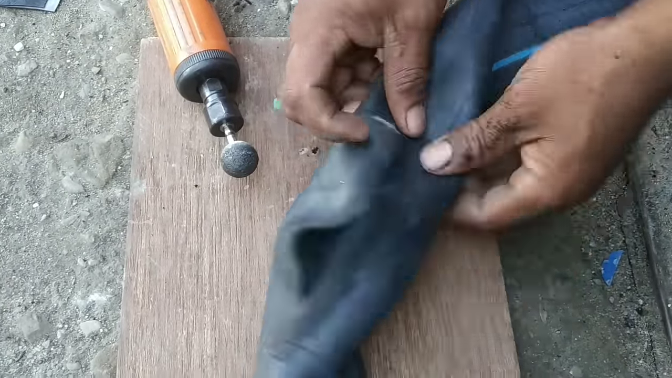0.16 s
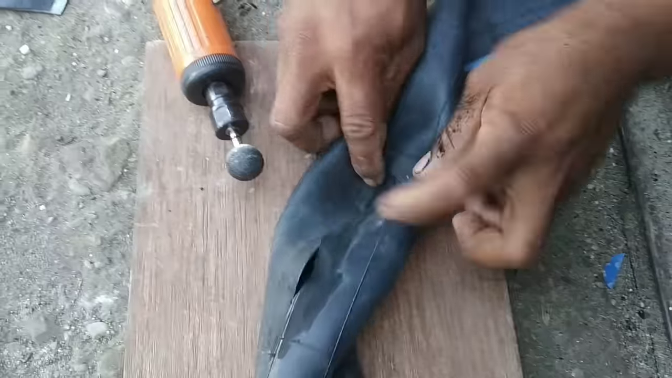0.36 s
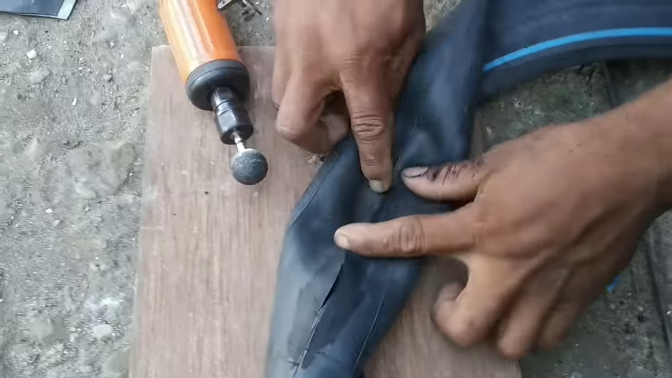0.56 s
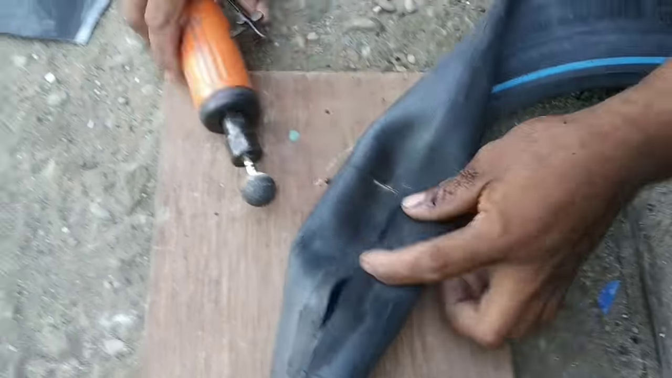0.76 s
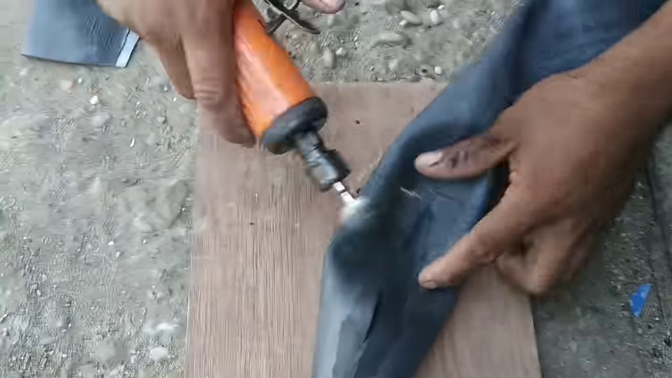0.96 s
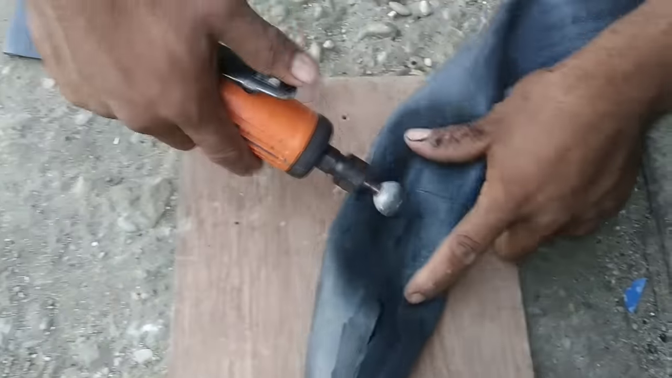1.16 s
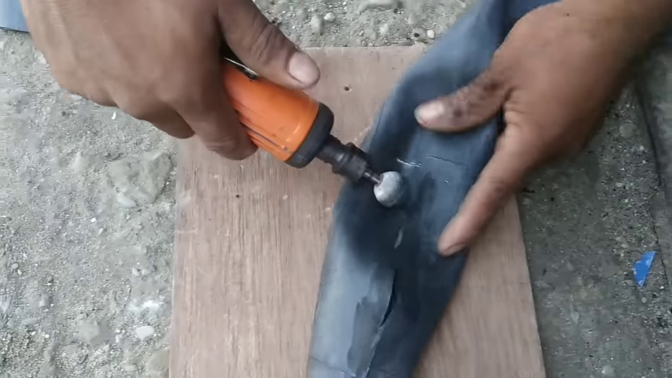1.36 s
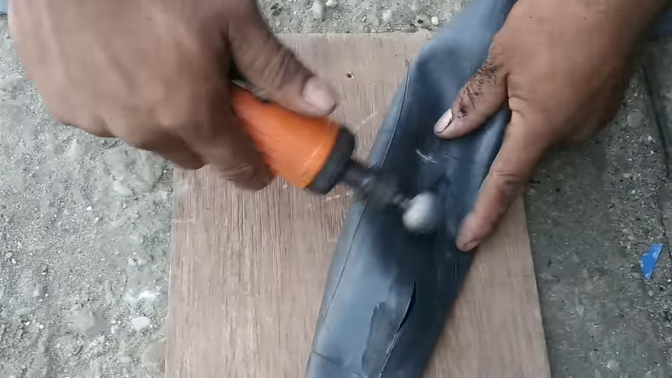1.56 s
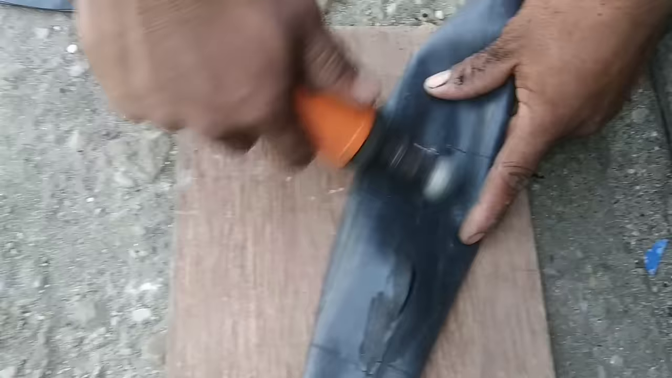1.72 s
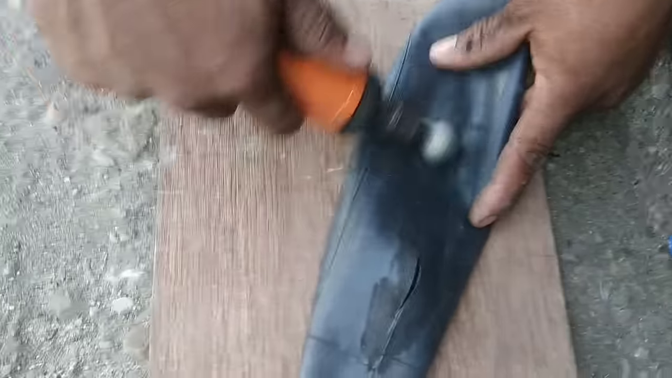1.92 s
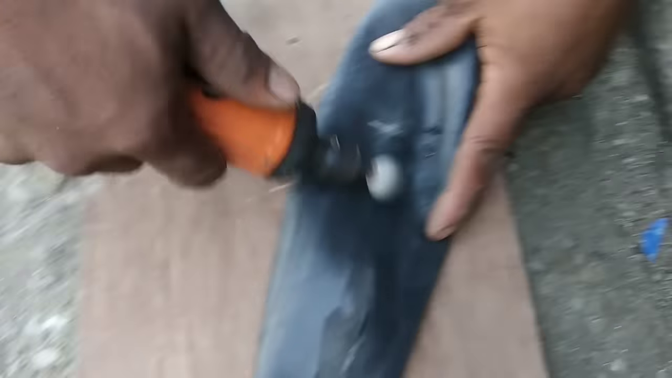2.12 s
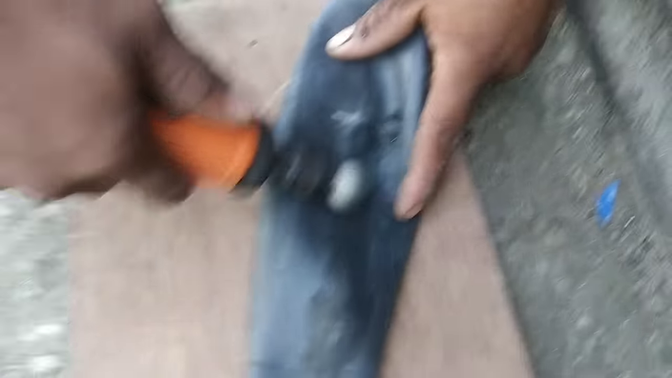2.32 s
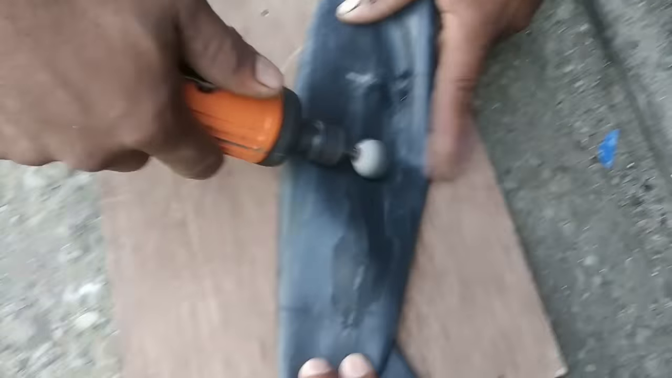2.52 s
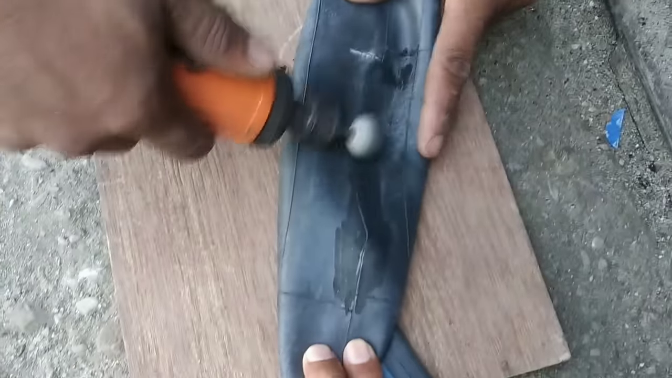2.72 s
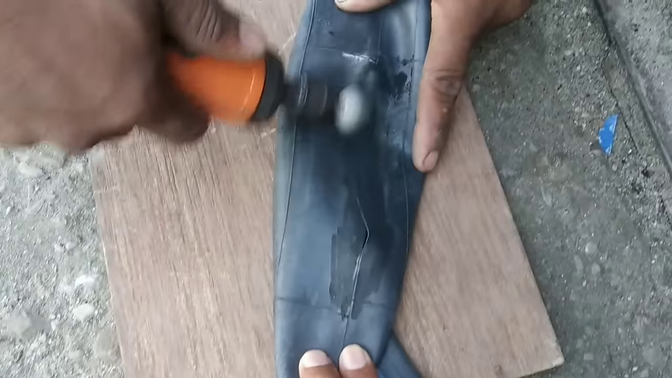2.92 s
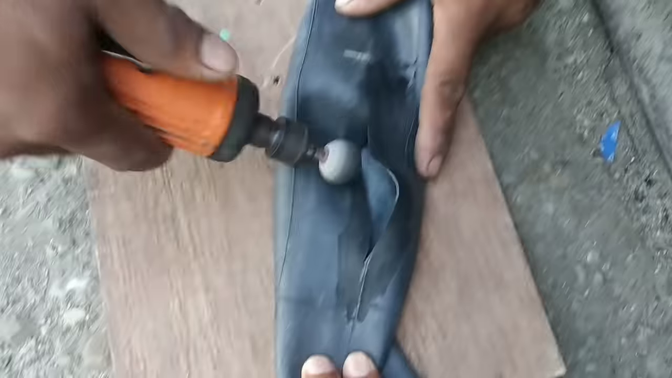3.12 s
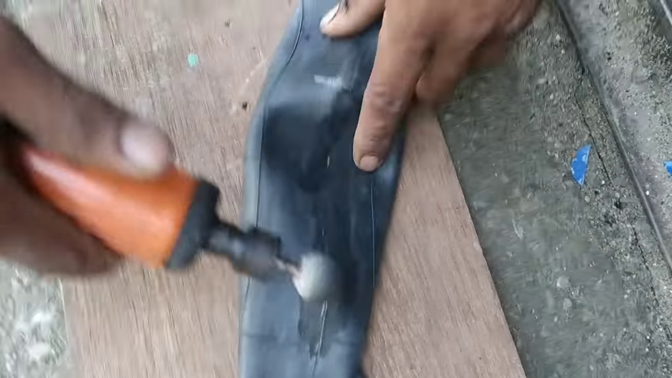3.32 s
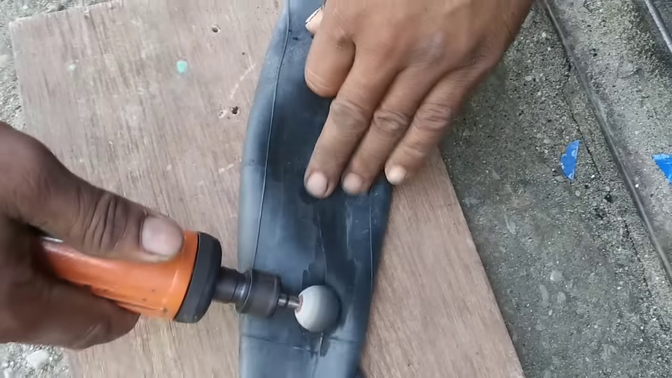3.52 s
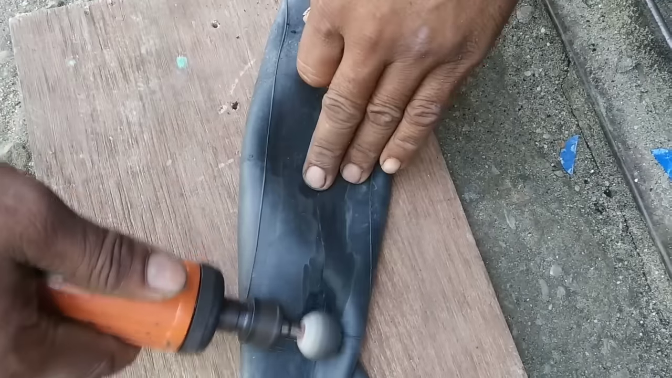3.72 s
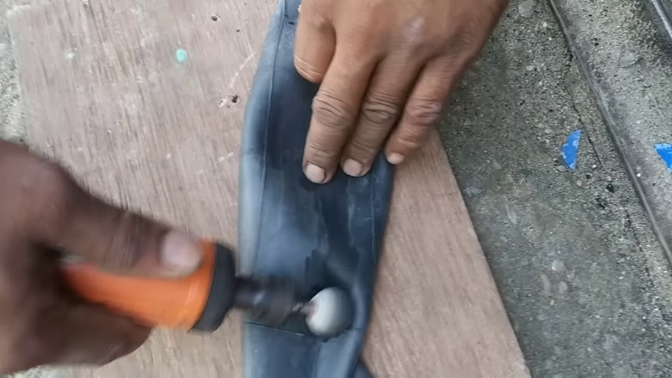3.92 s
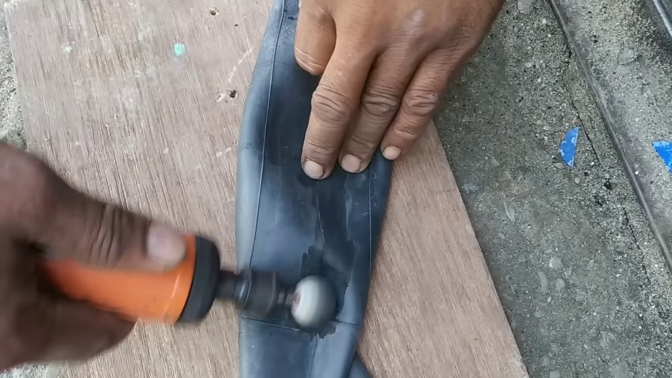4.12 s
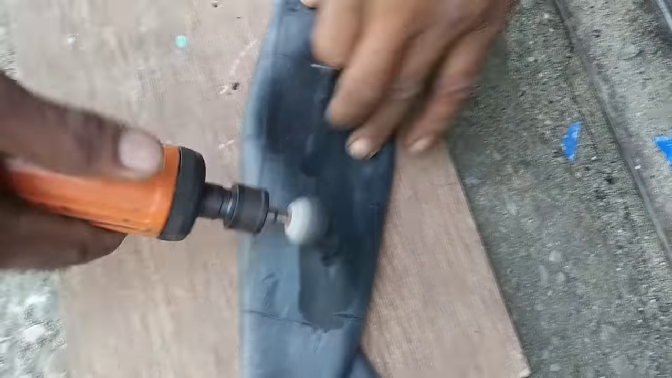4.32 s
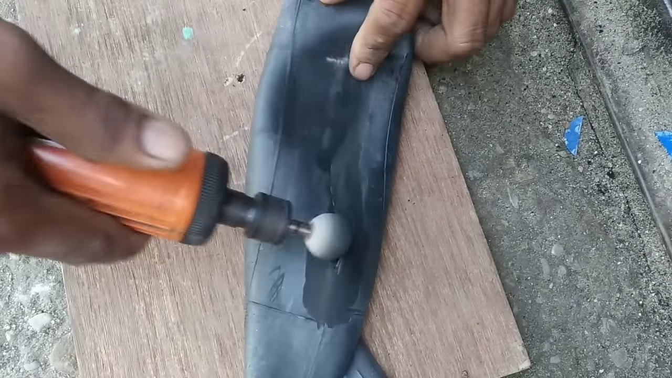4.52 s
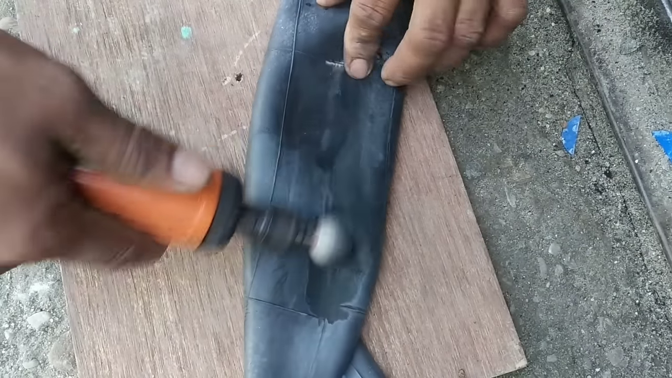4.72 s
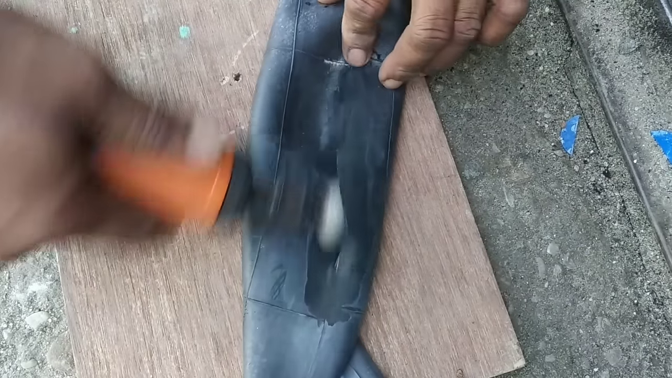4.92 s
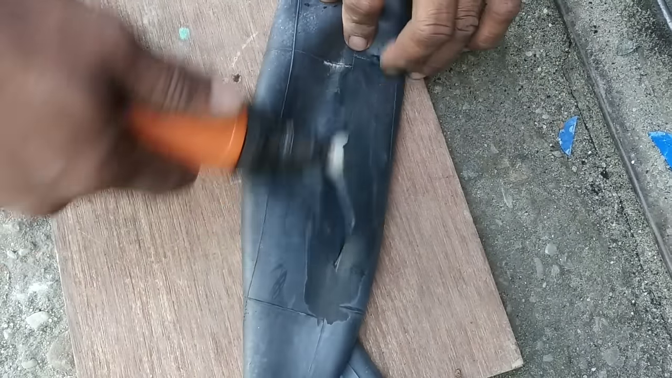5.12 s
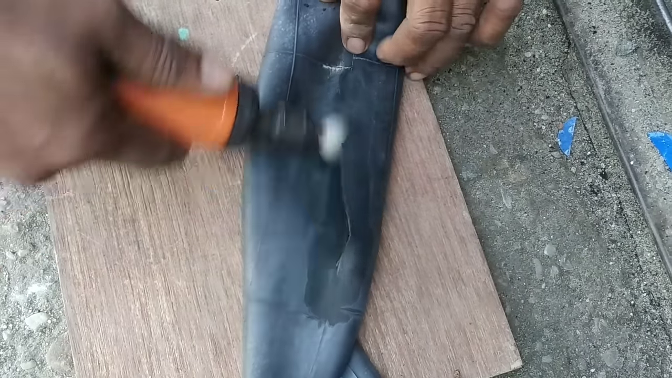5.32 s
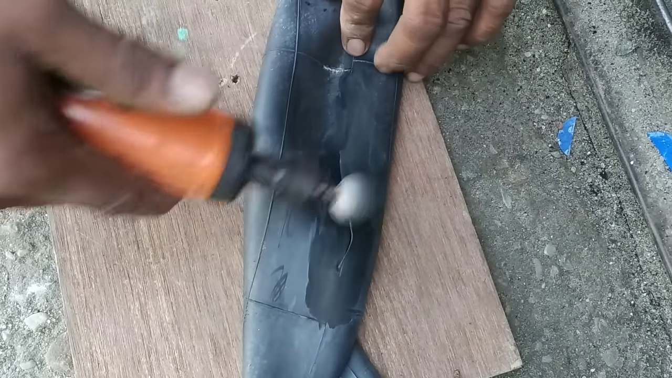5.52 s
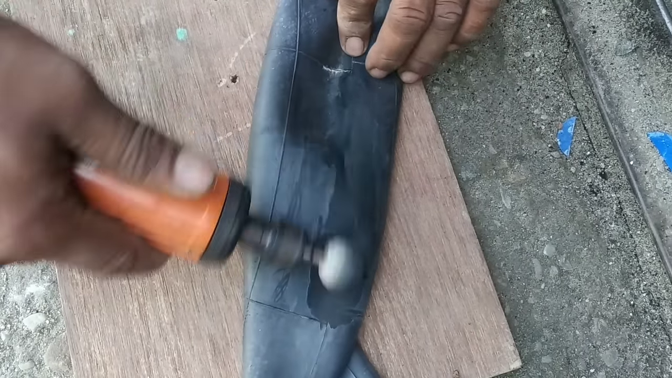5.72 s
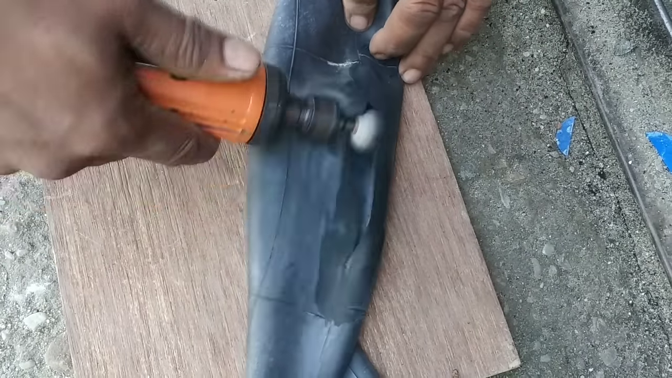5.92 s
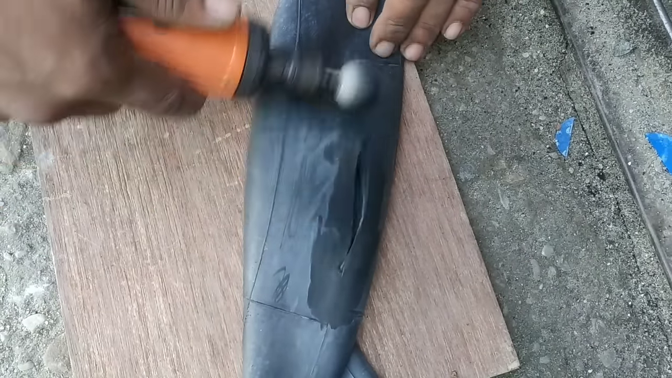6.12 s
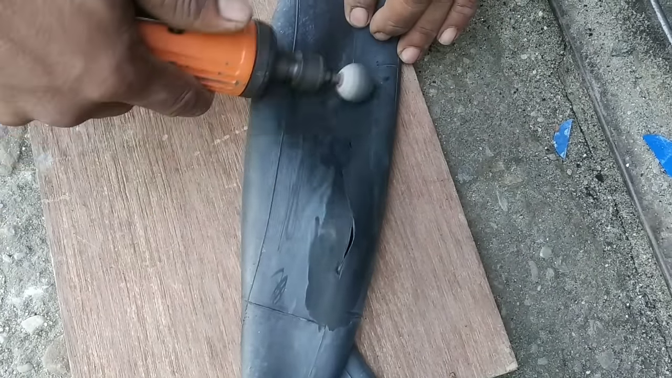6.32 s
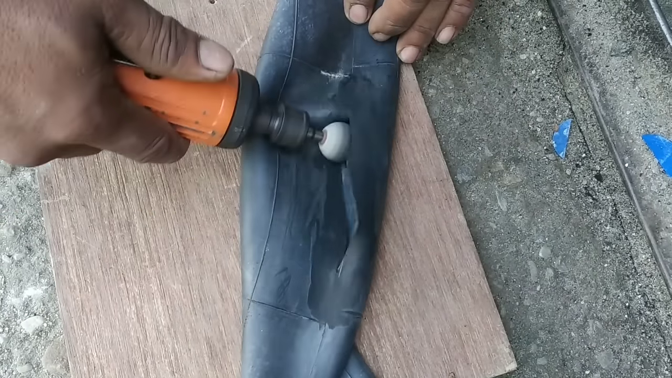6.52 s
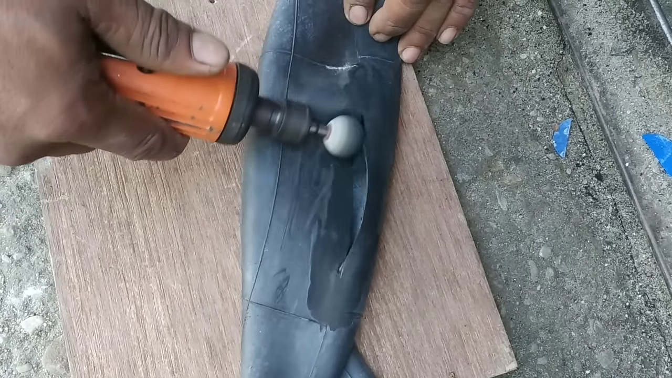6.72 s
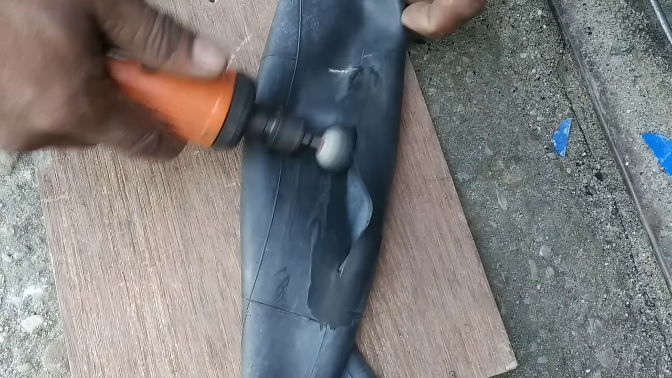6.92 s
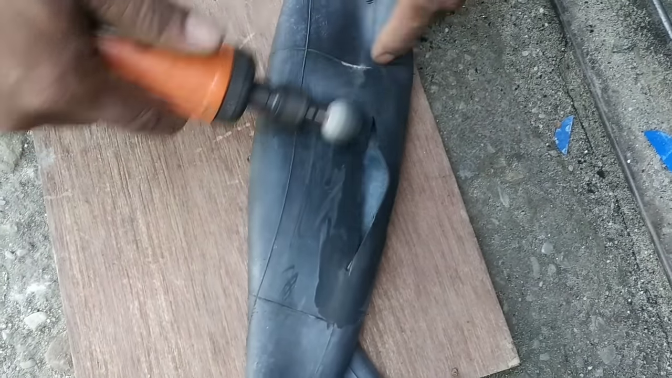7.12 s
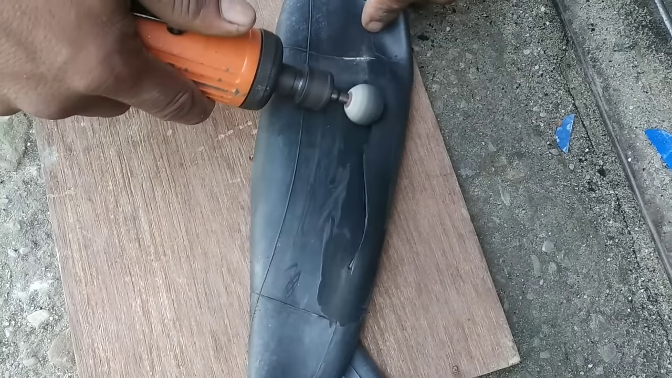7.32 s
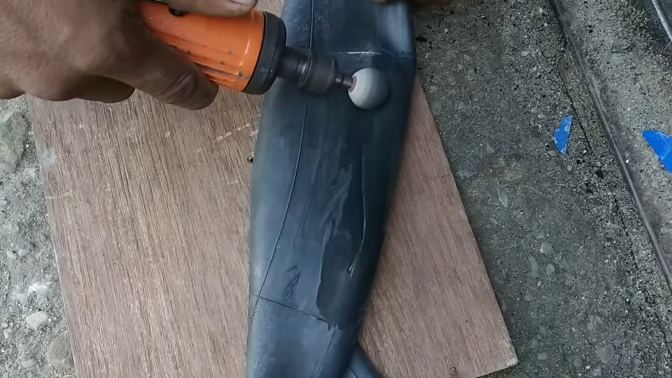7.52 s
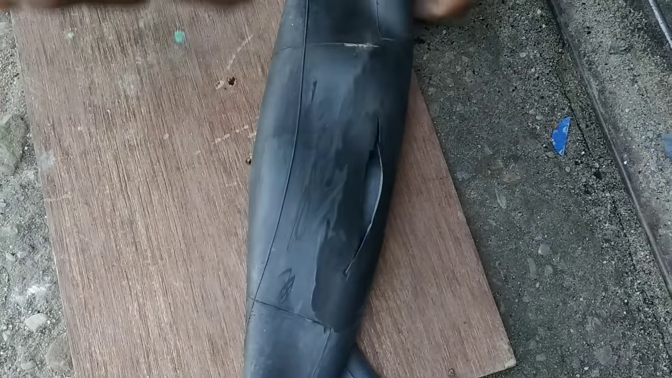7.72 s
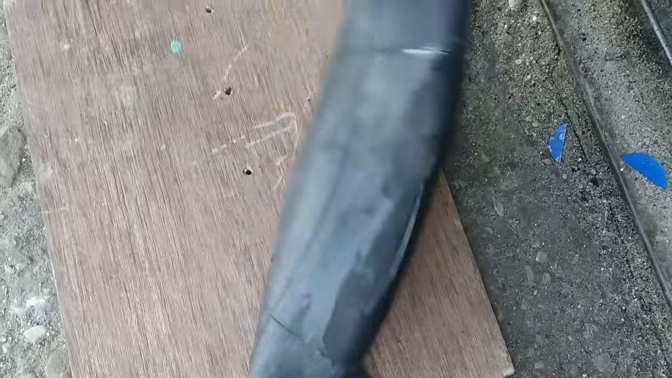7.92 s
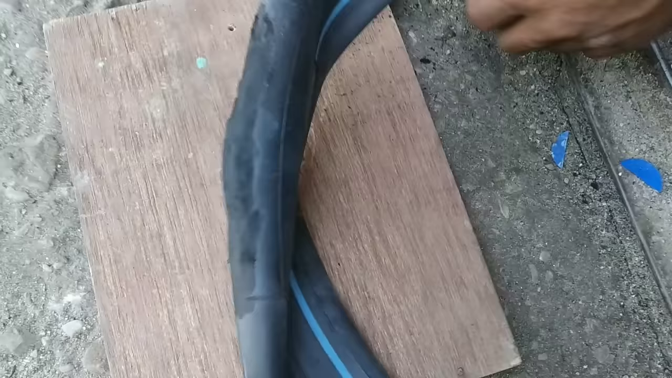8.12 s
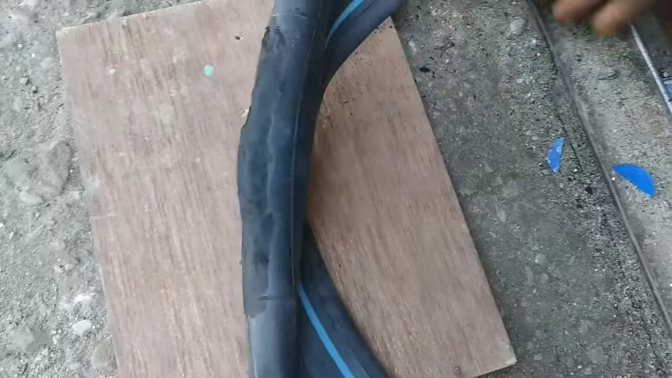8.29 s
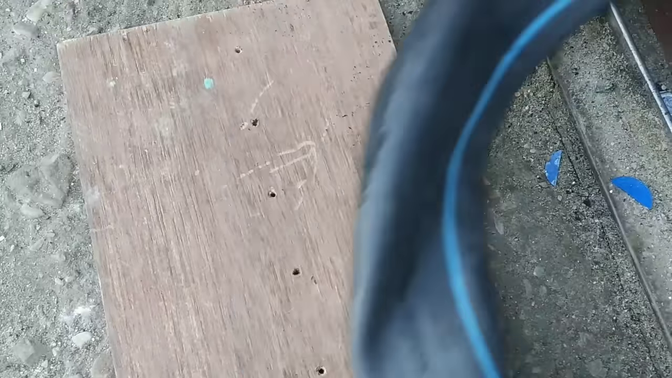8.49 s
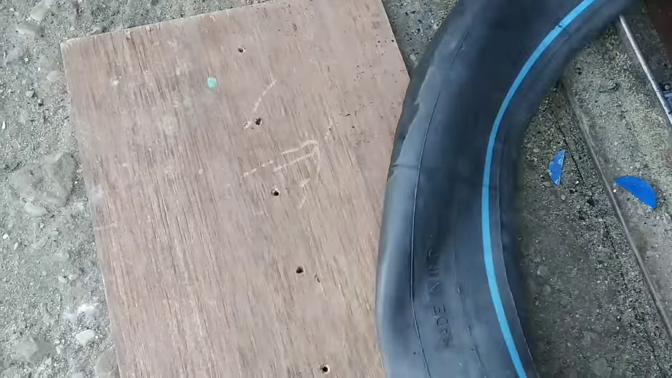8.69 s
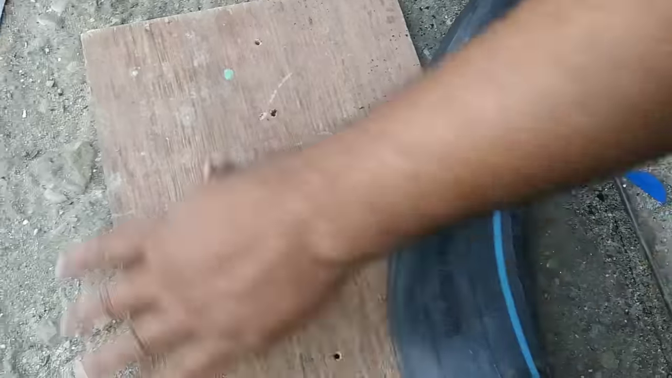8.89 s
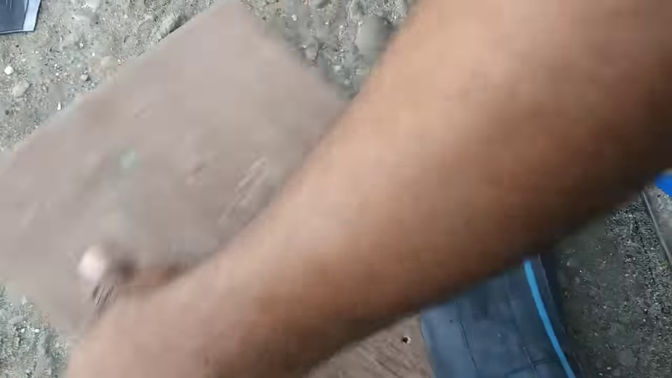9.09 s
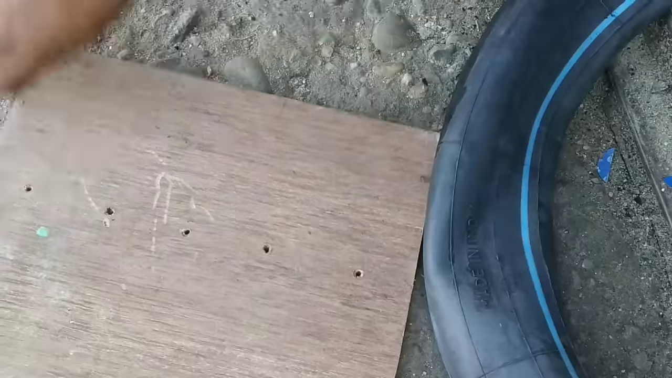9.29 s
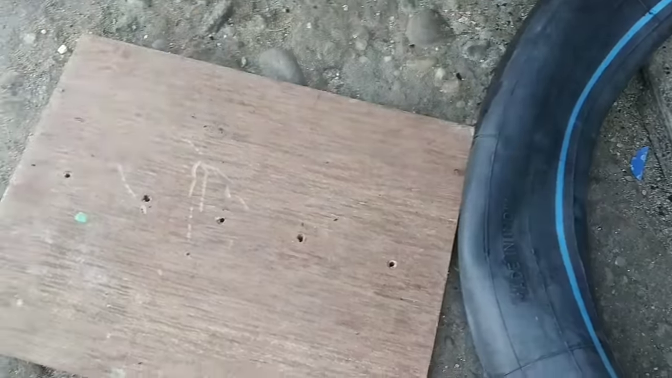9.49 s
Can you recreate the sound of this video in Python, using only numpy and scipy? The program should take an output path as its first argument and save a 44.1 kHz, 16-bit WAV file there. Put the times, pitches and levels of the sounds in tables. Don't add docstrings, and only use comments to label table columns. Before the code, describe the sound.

An open-air spot with low traffic rumble and faint steady hiss, heard close up in stereo. Rubber rustles softly at first; a far horn gives two short toots at about 0.5 and 0.7 s, and wood is knocked at 0.6 s and tapped until 1.0. At 1.45 s an air grinder bursts on, racing up within a tenth of a second to a piercing whine around 1.1 kHz with overtones and bright, rough hiss. Quick even strokes make its pitch dip until 3.1 s. It runs again from 3.35 to 4.3, 4.45 to 5.4 and 5.5 to 7.7 s, with falling whirr and puffing air between, and irregular deeper sags in the last spells. The air fades by 8 s. Knocks at 8.0 to 8.6 s mix with a rubbery flop. From 8.9 to 9.4 s the board rattles and scrapes loudly over grit, then only faint background remains.

```python
import sys
import numpy as np
from scipy import signal
from scipy.fft import rfft, irfft, next_fast_len
from scipy.io import wavfile
from scipy.ndimage import uniform_filter1d

SR = 44100
rng = np.random.default_rng(int(sys.argv[2]) if len(sys.argv) > 2 else 0)


def ratio_of_db(decibels):
    return 10 ** (np.asarray(decibels, float) / 20)


def put_to_file(sound):
    columns = np.atleast_2d(sound).T
    safe = np.clip(columns, -1, 1)
    whole_steps = np.round(safe * 32767)
    wavfile.write(sys.argv[1], SR, whole_steps.astype(np.int16))


N = 421155
TIME = np.arange(N) / SR
LEFT_LAG_S = 0.0003222
PIECE = 1024


def rms_one(x):
    return x / np.sqrt(np.mean(x ** 2) + 1e-20)


def undb(db):
    return np.exp(db * (np.log(10) / 20))


def in_time(rows):
    s, *columns = np.transpose(rows)
    return [np.interp(TIME, s, c) for c in columns]


def at_hz(points, hz):
    point_hz, level_db = np.transpose(points)
    return np.interp(np.log(hz + 1), np.log(point_hz), level_db)


def drift(rate):
    r = np.exp(-80 * np.pi * rate / SR)
    draws = rng.standard_normal(N // 40 + 2002)
    slow = signal.lfilter([1], [1, -2 * r, r * r], draws)[2000:]
    return np.interp(np.arange(N) / 40, np.arange(len(slow)), rms_one(slow))


def resonate(x, hz, width_hz):
    r, w = np.exp(-np.pi * width_hz / SR), 2 * np.pi * hz / SR
    return signal.lfilter([0, np.sin(w)], [1, -2 * r * np.cos(w), r * r], x + 1e-18)


def bump(s, length):
    return np.exp(-.5 * ((TIME - s) / length) ** 2)


def both_ports(x, pan_db=0):
    late = np.interp(TIME - LEFT_LAG_S, TIME, x)
    return np.array([late * ratio_of_db(pan_db / 2), x * ratio_of_db(-pan_db / 2)])


# frequency_hz, likeness_share
LIKENESS = [(25, 0.77), (70, 1), (140, 1), (300, 1), (700, 0.53), (1500, 0.094), (4000, 0.049),
            (12000, 0.1)]
# frequency_hz, left_minus_right_db
LEAN = [(60, -0.5), (180, 0), (550, -1), (1650, 2.5), (4000, 4.5), (7500, 1.5), (15000, -1.5)]


def lean_db(spectrum, hz):
    return at_hz(spectrum, hz) + at_hz(LEAN, hz) * [[.5], [-.5]]


def stereo_noise(spectrum, edges_hz, patchy_db, rate):
    size = next_fast_len(N)
    hz = np.arange(size // 2 + 1) * SR / size
    shared, left, right = rfft(rng.standard_normal((3, size)))
    alike = np.clip(at_hz(LIKENESS, hz), 0, 1)
    delayed = shared * np.exp(-2j * np.pi * hz * [[LEFT_LAG_S], [0]])
    pair = np.sqrt(alike) * delayed + np.sqrt(1 - alike) * np.array([left, right])
    pair = pair * ratio_of_db(lean_db(spectrum, hz))
    out, together = 0, drift(rate)
    for k in range(len(edges_hz)):
        mask = np.interp(hz, edges_hz, np.arange(len(edges_hz)) == k)
        flicker = undb(patchy_db * (0.44 * together + drift(rate)))
        out = out + irfft(pair * mask, size)[:, :N] * flicker
    return rms_one(out)


def coloured(x, spectrum):
    size = next_fast_len(N)
    hz = np.arange(size // 2 + 1) * SR / size
    return irfft(rfft(x, size) * ratio_of_db(lean_db(spectrum, hz)), size)[:, :N]


def noise_swells(rows):
    grains = rng.standard_normal((2, N)) * ratio_of_db(1.7 * drift(120))
    out = np.zeros((2, N))
    for s, length, db, hz in rows:
        near = slice(max(round((s - 3 * length) * SR), 0), round((s + 3 * length) * SR))
        swell = np.exp(-.5 * ((TIME[near] - s) / length) ** 2)
        out[:, near] += ratio_of_db(db) * swell * rms_one(resonate(grains[:, near], hz, 0.14 * hz))
    return out


# centre_s, length_s, gain_db
RATTLE_DUCK = (9.186, 0.043, -21)


def ducking():
    duck_db, lead_s, hold_s, fade_s = -23, 0.049, 0.041, .07
    loud = 0
    for opens, full, shuts in SPELLS:
        since = TIME - full + lead_s + fade_s / 2
        left = shuts + hold_s + fade_s - TIME
        loud = loud + np.clip(np.minimum(since, left) / fade_s, 0, 1)
    s, length, db = RATTLE_DUCK
    return duck_db * loud, db * bump(s, length)


# frequency_hz, density_db_per_hz
TRAFFIC = [(12, -39), (20, 7.5), (54, -3), (70, 5.5), (103, -1.5), (157, 2.5), (248, -10.5), (500, -14),
           (650, -14.5), (1100, -120)]
# frequency_hz, density_db_per_hz
YARD = [(180, -7.5), (300, -10), (602, -7.5), (688, -5.5), (911, -8), (1380, -11), (1950, -8),
        (3160, -10.5), (3730, -10.5), (5290, -9), (11000, -4), (15800, -13)]
# time_s, level_db
RUMBLE_DB = [(0, -43.5), (1.5, -43.5), (4.4, -38.5), (5.6, -40), (7.8, -46.5), (8.85, -50), (8.96, -44),
             (9.55, -50)]


def street():
    tool_db, rattle_db = ducking()
    rumble = stereo_noise(TRAFFIC, [30, 70, 140, 280], patchy_db=2.5, rate=2.74)
    rumble = rumble * ratio_of_db(in_time(RUMBLE_DB)[0] + tool_db + 0.6 * rattle_db)
    deep = signal.sosfilt(signal.butter(2, 188, fs=SR, output="sos"), rumble)
    session = (TIME > SPELLS[0][1]) & (TIME < SPELLS[-1][2])
    rumble = deep + (rumble - deep) * ratio_of_db(-2 * session)
    hiss = stereo_noise(YARD, [400, 900, 2000, 4000, 7000, 10000, 14000], patchy_db=1.66, rate=20.0)
    return rumble + hiss * ratio_of_db(-45 + rattle_db)


# centre_s, length_s, level_db, pitch_hz
RUSTLES = [
    (.08, .03, -50, 2350),
    (0.214, 0.021, -52, 2950),
    (0.945, 0.036, -50.5, 4600),
    (1.244, .04, -54.5, 3420),
    (7.883, 0.064, -56.5, 1300),
    (8.446, 0.036, -46.5, 1580),
    (8.293, 0.0058, -45, 4400),
]


def rustles():
    return noise_swells(RUSTLES)


# start_s, end_s, level_db
TOOTS = [
    (.462, .546, -48),
    (.656, .742, -48),
]
# harmonic_number, level_db
HORN = [(6, -10), (7, 5), (8, 7.5), (9, -2), (10, -9), (11, -3), (12, -9)]


def horn():
    horn_hz = 399
    tone, on = 0, 0
    for k, db in HORN:
        phase = k * 0.17 * drift(40) + rng.uniform(0, 9.1)
        tone = tone + ratio_of_db(db + 2.5 * drift(13)) * np.sin(2 * np.pi * k * horn_hz * TIME + phase)
    for start, end, db in TOOTS:
        attack = np.clip((TIME - start) / 0.013, 0, 1)
        on = on + ratio_of_db(db) * attack * np.exp(-np.clip(TIME - end, 0, 9) / 0.0088)
    return both_ports(tone * on * ratio_of_db(2.5 * drift(60) - 6), pan_db=6)


# pitch_hz, width_hz, level_db
BOARD = [(1300, 95, -11), (1700, 590, 1.5), (2000, 600, -11.5), (2790, 1200, -46)]
# start_s, peak_db, pitch_hz, brightness_db, left_minus_right_db
KNOCKS = [
    (0.598, -29.5, 946, -27, 2),
    (0.84, -45, 826, -10, 2.5),
    (0.918, -37.5, 900, -16, 5),
    (0.99, -39.5, 910, -14, 2.5),
    (8.034, -33.5, 650, -2, 2),
    (8.151, -41, 620, -17, 2),
    (8.325, -31, 865, -8, 6),
    (8.358, -40.5, 880, -9, -1.0),
    (8.427, -45, 610, 13, 2),
    (8.581, -37, 890, -11, 4),
]
RATTLE = [(8.935, -34, 780, -18, 3), (9.002, -26.5, 810, -17, 6), (9.014, -30.5, 700, -23, -3),
          (9.028, -32.5, 1880, 3, 3), (9.033, -30.5, 800, -14, 8), (9.073, -20, 780, -14, 5),
          (9.089, -26, 754, -19, 10), (9.116, -26.5, 2040, 0, 6), (9.119, -35, 755, -8, 9),
          (9.133, -36, 1700, -4, 6), (9.144, -26, 1990, 4.5, -3), (9.149, -30, 910, -11, -2),
          (9.162, -24, 900, -20, 9), (9.172, -23, 760, -7.5, -4), (9.177, -20.5, 1880, -15, 9),
          (9.206, -22, 920, -11, -9), (9.209, -23, 2030, 0.5, 3.5), (9.213, -27, 1300, -4, -9),
          (9.245, -24.5, 935, -9, -1), (9.25, -26, 920, -16, 16), (9.279, -22.5, 980, -5.5, -1),
          (9.298, -26, 1550, -4.5, -2), (9.303, -27, 1510, -15, -11), (9.309, -30, 795, -20, -11),
          (9.327, -23.5, 970, -12, 8), (9.344, -34, 950, -15, 8)]


def knocks():
    out, size = np.zeros((2, N)), 3000
    t = np.arange(size) / SR
    push = t / 0.0012 * np.exp(1 - t / 0.0012)
    thin = signal.butter(2, 480, "high", fs=SR, output="sos")
    for s, peak_db, hz, bright_db, pan_db in KNOCKS + RATTLE:
        contact = (np.sin(2 * np.pi * hz * t) + rng.standard_normal(size) * 2) * push
        ring = resonate(contact, hz, 0.1 * hz)
        upper_db = 13.0 + np.minimum(peak_db + 30, 0)
        for mode_hz, width_hz, db in BOARD:
            ring = ring + ratio_of_db(db + upper_db) * resonate(contact, mode_hz, width_hz)
        ring = signal.sosfilt(thin, ring)
        top_hz = np.clip(9000 * ratio_of_db(bright_db / 2), 3500, 14000)
        gritty = signal.butter(2, [2400, top_hz], "band", fs=SR, output="sos")
        crack = 3.26 * signal.sosfilt(gritty, rng.standard_normal((2, size)) * push ** 2)
        blow = ring / np.abs(ring).max() + ratio_of_db(bright_db - 10.5) * crack
        at = round(s * SR)
        out[:, at:at + size] += ratio_of_db(peak_db) * blow * ratio_of_db([[pan_db / 2], [-pan_db / 2]])
    return out


def by_spell(rows):
    spell = np.searchsorted(np.array(SPELLS)[:, 0], TIME) - 1
    return np.transpose(rows)[:, np.clip(spell, 0, None)]


def press(time, s, length):
    skew = .5
    t = time - s + skew * length
    return np.exp(-.5 * (t / (length * (1 + skew * np.sign(t)))) ** 2)


# valve_opens_s, full_speed_s, valve_shuts_s
SPELLS = [
    (1.452, 1.583, 3.103),
    (3.348, 3.478, 4.297),
    (4.447, 4.522, 5.388),
    (5.495, 5.592, 7.665),
]
# time_s, vane_rate_hz
LOADED = [(1.6, 1077), (2.4, 1053), (2.87, 1049), (3.098, 1141), (3.5, 1038), (3.75, 1068), (4.126, 1070),
          (4.293, 1136), (4.54, 1083), (5.02, 1099), (5.383, 1140), (5.62, 1084), (6.061, 1160),
          (6.42, 1113), (6.72, 1165), (7.176, 1135), (7.318, 1101), (7.658, 1104)]
# first_s, last_s, drop_hz
SWEEPS = [(1.707, 2.041, 55), (2.136, 2.457, 55), (2.671, 2.893, 55), (3.678, 4.085, 52),
          (6.223, 6.417, 35)]
# centre_s, drop_hz, length_s
STROKES = [(1.626, 29.9, 0.0098), (3, 150, 0.02), (3.881, 25.16, 0.051), (4.187, 73.7, .028),
           (4.705, 53.17, .014), (4.988, 24.2, .017), (5.07, 41.93, 0.028), (5.224, 55.3, .019),
           (5.315, 128.9, .013), (5.803, 66.15, .014), (5.906, 125.1, .016), (6.523, 145, .025),
           (6.657, 89.6, 0.02), (6.965, 129.5, 0.048), (7.125, 34.03, 0.02), (7.264, 47.04, 0.031),
           (7.527, 31.98, 0.026)]
# time_s, speed_share, whine_db, octave_db
GLIDES = [
    [(1.452, .14, -3, 0), (1.49, 0.27, -6.5, 0), (1.53, 0.41, 1, -3), (1.555, 0.83, 3, 0),
     (1.57, 0.93, 2, -2), (1.583, 1, -4.5, -1)],
    [(3.1, 1, 8, -6), (3.116, 0.82, 2, -6), (3.13, 0.59, 5, 5), (3.146, 0.46, -5, 1), (3.172, .26, -4, 13),
     (3.22, 0.14, 0, 0)],
    [(3.348, 0.14, 1, 18), (3.4, 0.23, -1, 19), (3.43, 0.47, -2, -8), (3.445, 0.57, 5, 7),
     (3.457, 0.8, 5, -13), (3.474, 1, -0.5, -3)],
    [(4.295, 1, -0.5, -6), (4.312, 0.73, 1, 7), (4.325, 0.57, 4.5, 2), (4.34, .4, -12, 7.5),
     (4.362, .26, -4, 11), (4.41, 0.14, -6, 2)],
    [(4.447, 0.12, 2, -2), (4.465, 0.24, 5, 9), (4.486, 0.4, 0.5, 0), (4.5, 0.71, 2, 1), (4.51, 0.8, 9, -4),
     (4.522, 0.99, -4, -1.5)],
    [(5.385, 0.99, -2, -1), (5.396, 0.74, 5, -5), (5.411, .58, 2, -2), (5.426, 0.43, -3.5, 9),
     (5.445, 0.31, -5, 15), (5.49, .16, -4, 5)],
    [(5.5, 0.17, -3, 3), (5.53, 0.24, 1, 18), (5.55, 0.4, 2, 3), (5.562, 0.61, 9, 0), (5.573, 0.84, 0, -5),
     (5.592, 0.98, -2.5, -9.5)],
    [(7.664, 0.98, 2.5, -9.5), (7.675, 0.81, 1, 0), (7.69, 0.56, -1.5, 1), (7.71, 0.38, -9, 7),
     (7.74, 0.27, -4, 6), (7.78, 0.18, 5, 5)],
]
# time_s, whine_db, brightness_db, octave_db
TILT = [
    [(1.59, 4.5, 5, -3), (1.68, 2, 2.5, -14), (1.77, -2, -2, -8), (1.87, 1.5, -3, -4), (1.96, 4, 4.5, 0),
     (2.3, 4, -3, 3), (2.68, 6, 1, -0.5), (2.9, 1, -2.5, 5.5), (3.1, -9, -5.5, 6)],
    [(3.5, 0.5, 2, 5.5), (3.6, -5.5, 6, 0), (3.7, -1, -4, -2), (3.8, -6.5, -7, -1.5), (3.97, 2.5, -4, -0.5),
     (4.1, -2, -4, -2), (4.2, 3, -2, 0), (4.29, 5, 3, 0)],
    [(4.53, -6, -2, 2.5), (4.63, 5, -6, 4), (4.8, -2, -2.5, -2.5), (4.92, -2, -3, -5),
     (5.04, -6.5, 0.5, -2.5), (5.2, -0.5, 3, 4.5), (5.38, 7, -4.5, -8)],
    [(5.62, 6, -1.5, 11.5), (5.85, 3, 0.5, 2.5), (6.16, 0.5, -1.5, -3.5), (6.35, -0.5, 3.5, 11),
     (6.6, 4, 2, -0.5), (6.95, -4, -0.5, -1), (7.1, -4, 5, -6.5), (7.3, 0.5, 8.5, -1), (7.66, -5.5, 3.5, 0)],
]
TILT_SHARES = [(0.78, 0.13, 0), (0.023, 0.11, 0.84), (0, 0.7, 0.057), (0.25, 0.015, 0.17),
               (0.25, 1.3, 0.038)]
# h1_db, h2_db, h3_db, h4_against_hiss_db, h9_against_hiss_db
GRIPS = [(-41, -42, -40, -18.5, -15), (-44.5, -38.5, -41, -20.5, -10), (-40.5, -41, -40.5, -16, -5.5),
         (-44.5, -37, -38.5, -14, -10)]
SPEED_DB = [4.6, 2.6, 0.94, 2.7, 4.8]
PRESS_DB = [3.5, -1.5, 2.5, -3, -2]
GLIDE_DB = [-41.5, -46, -43.5, -15, -7]
# time_s, level_db
COVER = [(1.6, -1.5), (1.72, -2.5), (2.5, 2.5), (2.9, 0.5), (3.08, 2.5), (3.5, -3), (3.7, 2.5), (4.22, 3.5),
         (4.28, -4.5), (4.6, 1.5), (5.3, 0.5), (5.64, -6), (5.8, 0.5), (6.2, 4), (6.6, -7), (6.78, 0),
         (6.95, -4.5), (7.2, -2.5)]


def rotor():
    surge_hz, surge_s = 130, .2
    period_s, sweep_press_s = .106, .019
    coast_s = 0.11
    opens, full, shuts = by_spell(SPELLS)
    free_hz = in_time(LOADED)[0] + surge_hz * np.exp(-np.clip(TIME - full, 0, None) / surge_s)

    sweeps = []
    for first, last, drop_hz in SWEEPS:
        count = round((last - first) / period_s) + 1
        sweeps += [(s, drop_hz, sweep_press_s) for s in np.linspace(first, last, count)]
    coarse = TIME[::32]
    drops = sum(drop_hz * press(coarse, s, length) for s, drop_hz, length in sweeps + STROKES)
    press_hz = np.interp(TIME, coarse, drops)
    share, whine_db, octave_db = in_time(np.concatenate(GLIDES))
    vane_hz = free_hz * share - press_hz

    gliding = np.clip(8 * (1 - share), 0, 1)
    tilt_db = np.array(TILT_SHARES) @ in_time(np.concatenate(TILT))
    steady_db = by_spell(GRIPS) + tilt_db
    steady_db = steady_db + np.outer(SPEED_DB, (free_hz - 1100) / 100) + np.outer(PRESS_DB, press_hz / 100)
    lines_db = steady_db * (1 - gliding) + np.outer(GLIDE_DB, gliding)
    lines_db[0] += whine_db
    lines_db[1] += octave_db
    lines_db[2] += in_time(COVER)[0]

    running = (TIME > opens) & (TIME < shuts + coast_s)
    slow = np.clip(1 - vane_hz / 960, 0, 1)
    vane_hz = vane_hz * (1 + .003 * drift(32.3) + .15 * slow * drift(55))
    turn = np.cumsum(vane_hz / 4) * 2 * np.pi / SR
    return slow, turn, uniform_filter1d(running * 1., size=400), lines_db


# after_opening_s, level_db
OPENING = [(-.004, -46), (.002, -4.5), (.03, 1), (.12, 0)]
# after_shutting_s, level_db
AFTERBLOW = [(-.03, 0), (-.005, 1), (.045, -8.5), (.09, -3.5), (.23, -14), (.3, -8), (.335, -39.5)]
# hiss_db, lower_roar_db, first_burst_db
JETS = [
    (-30, 1.5, 3),
    (-29.5, -4, 8),
    (-29.5, -3, 9),
    (-30, -6, -6),
]


def air(slow):
    burst_s = 0.0052
    shapes = []
    for (opens, full, shuts), (db, roar_db, burst_db) in zip(SPELLS, JETS):
        valve_db = np.interp(TIME - opens, *np.transpose(OPENING))
        valve_db = valve_db + np.interp(TIME - shuts, *np.transpose(AFTERBLOW))
        shapes.append(db + valve_db + burst_db * np.exp(-np.abs(TIME - opens) / burst_s))
    roar_db = by_spell(JETS)[1] * (1 - np.sqrt(slow)) + 9 * np.sqrt(slow) + 3.5 * drift(3.4)
    roar_db = roar_db - 12 * np.exp(-np.abs(TIME - SPELLS[0][0]) / burst_s)
    silent = TIME < SPELLS[0][0] + OPENING[0][0]
    return np.max(shapes, axis=0) - 60 * silent, roar_db


# frequency_hz, density_db_per_hz
EXHAUST = [(100, -55), (200, -54), (900, -13.5), (1900, -11), (2700, -7), (3750, -5), (4700, -5.5),
           (5800, -3.5), (6900, 3), (8400, -5), (9900, 3), (11500, -1.5), (12300, -0.5), (15800, -8)]


def exhaust(slow, turn, running, air_db, roar_db):
    edges_hz = [200, 600, 1200, 2000, 2700, 3500, 4400, 5400, 6400, 7400, 8400, 9400, 10400, 11400,
                12400, 13600, 15000]
    noise = stereo_noise(EXHAUST, edges_hz, patchy_db=1.58, rate=35.0)
    chop = 1 + running * (0.61 * np.cos(4 * turn) + 0.092 * np.cos(turn))
    low = signal.sosfilt(signal.butter(2, 3300, fs=SR, output="sos"), noise)
    bursts = rng.standard_normal((2, N)) * (1.4 + np.cos(4 * turn)) ** 2 * ratio_of_db(32.0 * drift(44))
    cavity = signal.butter(2, [2200, 3300], "band", fs=SR, output="sos")
    muffler = rms_one(signal.sosfilt(cavity, bursts))
    jet = (noise - low) * chop + low * ratio_of_db(roar_db) + ratio_of_db(-21.0) * np.sqrt(slow) * muffler
    return ratio_of_db(air_db + 1.0) * jet


def buzz(slow, turn, air_db):
    orders, angle = np.arange(13, 57), np.linspace(0, 2 * np.pi, 4097)
    sizes = ratio_of_db(-2.5 * (orders % 4 == 0))
    out = np.zeros((2, N))
    for _ in range(5):
        start = rng.uniform(0, 2 * np.pi, (len(orders), 1))
        shape = sizes @ np.sin(orders[:, None] * angle + start)
        wave, common = np.interp(turn % (2 * np.pi), angle, shape), drift(5.3)
        out += wave * np.array([.5 * common + drift(11.3), .5 * common + drift(6.8)])
    return rms_one(coloured(out, EXHAUST)) * ratio_of_db(air_db - 6 - 20 * slow)


# delay_s, wander_s, share
ECHOES = [
    (.00039, 0.000037, 0.34),
    (.0013, .0002, 0.5),
    (.0031, .0004, .3),
]


def reflections(x):
    out = x.copy()
    for delay, wander, share in ECHOES:
        for side in (0, 1):
            out[side] += share * np.interp(TIME - delay - wander * drift(1.5), TIME, x[side])
    return out / np.sqrt(1 + sum(share ** 2 for delay, wander, share in ECHOES))


# from_hz, to_hz
HOLLOWS = [(1700, 2150), (3150, 3700)]


def hollowed(jet, slow):
    bands = sum(signal.lfilter(*signal.butter(1, band, "band", fs=SR), jet) for band in HOLLOWS)
    return jet - np.clip(0.74 * 2 * np.sqrt(slow), 0, 1) * bands


def chuffs_rows():
    return CHUFFS


# centre_s, length_s, level_db, pitch_hz
CHUFFS = [(1.46, 0.0052, -27.5, 6160), (1.458, 0.004, -45, 4160), (1.501, .012, -34, 2960),
          (3.13, 0.013, -44, 2700), (3.207, 0.024, -42, 2630), (3.379, 0.02, -45, 2816),
          (4.31, .008, -40, 1514), (5.421, .012, -41, 2482), (5.524, .006, -34.5, 2800),
          (7.685, .01, -48, 2700), (7.755, 0.036, -47.5, 2830)]


def chuffs():
    return noise_swells(CHUFFS)


def pieces(turn):
    glide_kept, steepness = .4, 1.8
    n = np.arange(N)
    centre = np.minimum((n // PIECE + np.array([[0], [1]])) * PIECE, N - 1)
    held = turn[centre] + np.gradient(turn)[centre] * (n - centre)
    fade = np.clip(.5 + steepness * (n % PIECE / PIECE - .5), 0, 1)
    return held + glide_kept * (turn - held), np.array([1 - fade, fade])


def joins(order):
    misfit_rad = np.minimum(.07 * order, 2)
    phase = np.cumsum(misfit_rad * rng.standard_normal(N // PIECE + 2))
    return phase[np.arange(N) // PIECE + np.array([[0], [1]])]


def housing_db(turn, order):
    mode_hz, width_hz = 4760, 380
    hz = order * np.gradient(turn) * SR / (2 * np.pi)
    return -10 * np.log10(1 + ((hz - mode_hz) / width_hz) ** 2)


# order_number, level_db
ROTOR = [(1, -37), (2, -36), (3, -39.5), (5, -31.5), (6, -33.5), (24, -11), (44, -14.5)]
# left_minus_right_db, left_lag_rad
LINE_PORTS = [(-2.5, 1.5), (0, -1.46), (-1, 1.31), (15, -1.63), (-2.5, 1.77)]


def whine(slow, turn, air_db, lines_db):
    root = np.sqrt(slow)
    dip_db = 4 * root * (.6 + np.cos(2 * np.pi * np.arange(N) / PIECE))
    fade_db = -65 * np.clip(slow - .52, 0, 1) + 1.5 * root * drift(60) + dip_db
    levels_db = [db + fade_db - 8 * k * root for k, db in enumerate(lines_db[:-2])]
    fourth_db, ninth_db = (db + air_db - 60 * slow for db in lines_db[-2:])
    levels_db += [fourth_db + 1.5 + housing_db(turn, order=16), ninth_db]
    partials = [(order, db, *ports) for order, db, ports in zip((4, 8, 12, 16, 36), levels_db, LINE_PORTS)]
    partials += [(order, db + air_db - 30 * slow, 0, 0.11 * order) for order, db in ROTOR]

    out = np.zeros((2, N))
    turns, fades = pieces(turn)
    for order, db, pan_db, lag in partials:
        common, spread = drift(26), min(order / 4, 1)
        blur = .022 * order * drift(50) + .9 * root * drift(150)
        flutter_db = 4 if order == 8 else 1.5
        phases = order * turns + joins(order) + blur
        sine = (fades * np.sin(phases)).sum(axis=0)
        cosine = (fades * np.cos(phases)).sum(axis=0)
        for channel, side in enumerate((1, -1)):
            shade_db = flutter_db * common + 2.0 * spread * drift(24) + side * pan_db / 2
            late = (1 - slow) * (side * lag / 2 - 0.25 * spread * drift(4.7))
            line = sine * np.cos(late) - cosine * np.sin(late)
            out[channel] += np.sqrt(2) * undb(db + shade_db) * line
    return out


def strand(turn, air_db):
    shade_db = 3.9 * drift(8.3) + 1.8 * np.array([drift(25), drift(25)])
    level_db = air_db - 16.5 + 2 * housing_db(turn, order=17) + shade_db
    phase = 17 * turn + .5 * drift(46) + 1.95 * np.array([[-1], [0]])
    return np.sqrt(2) * undb(level_db) * np.sin(phase)


# centre_s, length_s, harmonic_number, level_db
GLINTS = [(1.565, 0.012, 3, -30), (1.59, 0.023, 5, -35), (3.55, 0.074, 10, -33.5), (3.6, 0.042, 6, -36),
          (3.75, 0.066, 5, -41), (4.022, 0.086, 5, -40.5), (4.101, 0.074, 10, -36), (4.15, 0.097, 6, -36),
          (4.9, .08, 11, -41), (4.279, 0.013, 10, -35), (5.572, 0.005, 3, -30), (5.701, 0.05, 11, -45),
          (5.871, .04, 11, -43), (6.049, .06, 10, -43), (6.599, 0.042, 11, -40), (6.799, 0.051, 11, -42),
          (7.05, 0.039, 11, -37), (7.23, .03, 11, -44.5), (7.6, 0.051, 11, -50), (7.64, .02, 4, -45)]


def glints(turn):
    out, chatter, shade = np.zeros((2, N)), drift(50), np.array([drift(25), drift(25)])
    turns, fades = pieces(turn)
    for s, length, harmonic, db in GLINTS:
        near = slice(round((s - 3 * length) * SR), round((s + 3 * length) * SR))
        order = 4 * harmonic
        swell = np.exp(-.5 * ((TIME[near] - s) / length) ** 2)
        swell = np.sqrt(2) * undb(db + 2.5 * shade[:, near]) * swell
        for part, fade in zip(turns, fades):
            phase = order * (part[near] + 0.03 * chatter[near]) + 1.02 * np.array([[1], [0]])
            out[:, near] += swell * fade[near] * np.sin(phase)
    return out


# centre_s, length_s, level_db
PUFFS = [
    (1.582, 0.051, -33.5),
    (2.004, .015, -40),
    (2.115, 0.023, -40.5),
    (2.22, 0.024, -42),
    (3.503, 0.037, -36),
    (4.291, 0.012, -40),
    (5.694, 0.014, -39),
    (6.03, 0.018, -44),
]


def puffs():
    return -sum(ratio_of_db(db) * bump(s, length) for s, length, db in PUFFS)


# time_s, level_db
DRAG = [
    (8.92, -55),
    (9.012, -48),
    (9.15, -37),
    (9.21, -39.5),
    (9.342, -34.5),
    (9.42, -59),
]


def drag():
    sizes = ratio_of_db(1.2 * np.minimum(rng.exponential(1, N), 3))
    grit = (rng.random(N) < 2500 / SR) * rng.standard_normal(N) * sizes
    body = resonate(grit, 786, 110) + resonate(grit, 927, 60)
    body = body + sum(ratio_of_db(db) * resonate(grit, hz, width_hz) for hz, width_hz, db in BOARD)
    body = signal.sosfilt(signal.butter(3, 520, "high", fs=SR, output="sos"), body)
    sliding = (TIME > DRAG[0][0]) & (TIME < DRAG[-1][0])
    return rms_one(body) * ratio_of_db(in_time(DRAG)[0] - 1.8) * sliding * ratio_of_db([[-.8], [.8]])


def scene():
    slow, turn, running, lines_db = rotor()
    air_db, roar_db = air(slow)
    jet = running * buzz(slow, turn, air_db) + exhaust(slow, turn, running, air_db, roar_db)
    tool = hollowed(reflections(jet), slow) + chuffs() + glints(turn) + puffs()
    tool = tool + running * (whine(slow, turn, air_db, lines_db) + strand(turn, air_db))
    return street() + rustles() + horn() + knocks() + tool + drag()


# frequency_hz, taken_off_margin_db
THIN_BANDS = [(1950, 0.4), (3650, 2), (5700, 3.5), (8200, -3.5), (11500, 3.5), (13600, 3)]


def spectral_thinning(x, margin_db, weak_db):
    window = np.sin(np.pi * (np.arange(2048) + .5) / 2048)
    kw = dict(window=window, nperseg=2048, noverlap=1024)
    z = signal.stft(x, **kw)[2]
    power = np.abs(z[:, :1024]) ** 2 + 1e-20
    band = power.reshape(2, 128, 8, -1).mean(axis=2)
    around = np.exp(uniform_filter1d(np.log(band), size=9, axis=1))
    hz = (np.arange(128)[:, None] + .5) * SR / 256
    margin_db = margin_db + .4
    for centre_hz, db in THIN_BANDS:
        margin_db = margin_db - db * np.exp(-.5 * ((hz - centre_hz) / (.05 * centre_hz + 60)) ** 2)
    chance_db = 7.5 * uniform_filter1d(rng.standard_normal(band.shape[1:]), size=3)
    sunken = band.mean(axis=0) < around.mean(axis=0) * ratio_of_db(-2 * margin_db + chance_db)
    faint = power < band.repeat(8, axis=1) * ratio_of_db(-2 * weak_db)
    high = (np.arange(1024) > 80)[:, None]
    z[:, :1024] *= ~((sunken.repeat(8, axis=0) | faint) & high)
    return signal.istft(z, **kw)[1][:, :N]


def roll_off(x):
    return signal.sosfilt(signal.butter(12, 16870, fs=SR, output="sos"), x)


def record(dry):
    rippled = dry * (1 + .11 * np.cos(2 * np.pi * np.arange(N) / PIECE + .3))
    thinned = spectral_thinning(rippled, margin_db=3.0, weak_db=1.5)
    mix = signal.sosfilt(signal.ellip(12, .5, 80, 15730, fs=SR, output="sos"), thinned)
    return roll_off(mix)


dry = scene()
out = record(dry)
put_to_file(out)
```